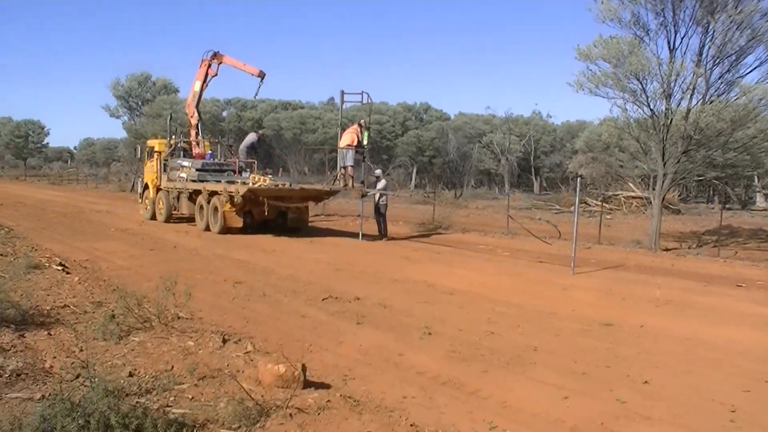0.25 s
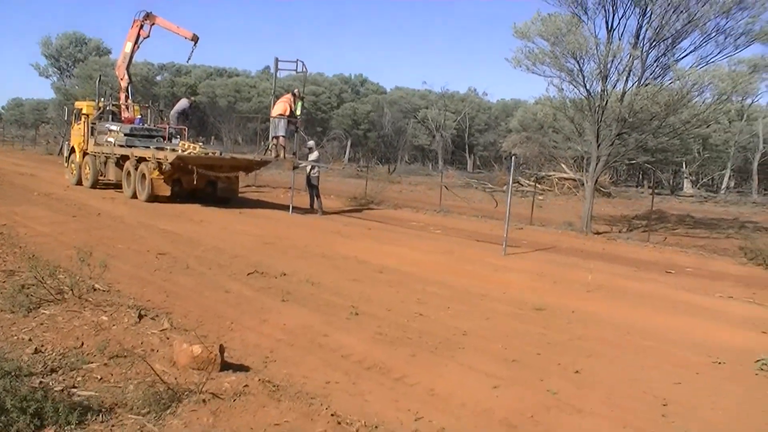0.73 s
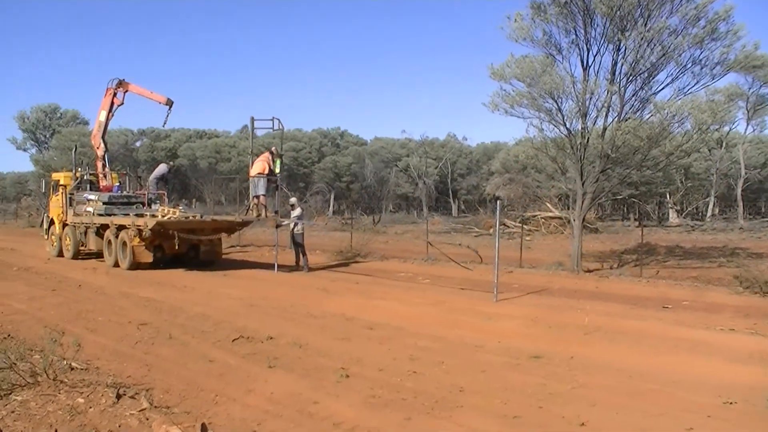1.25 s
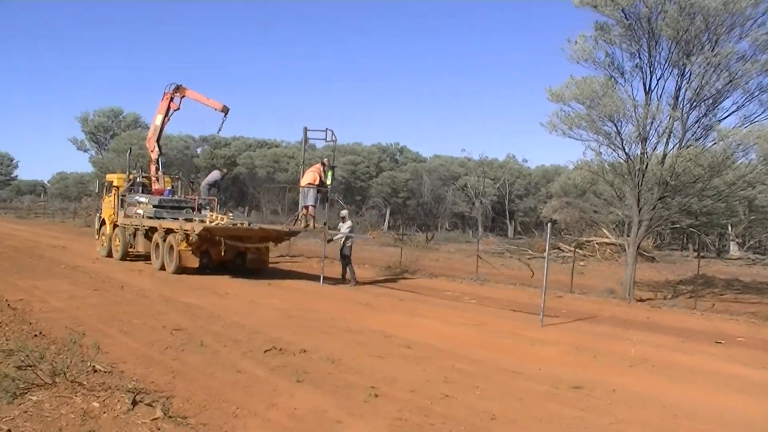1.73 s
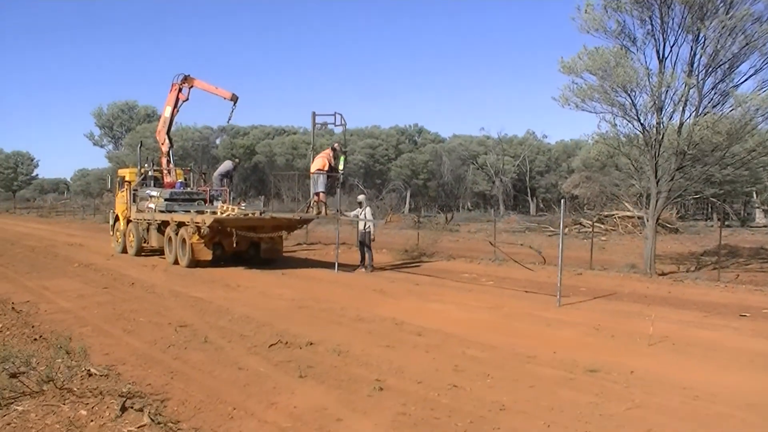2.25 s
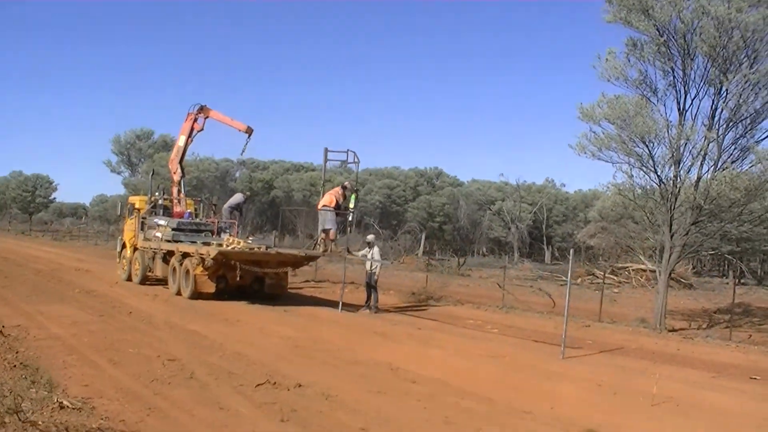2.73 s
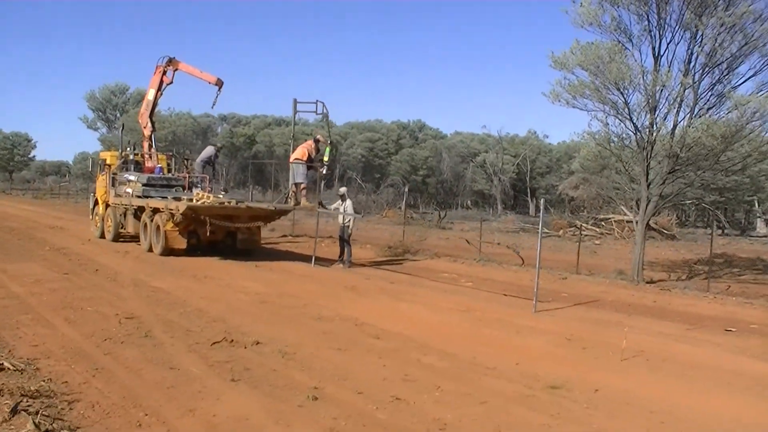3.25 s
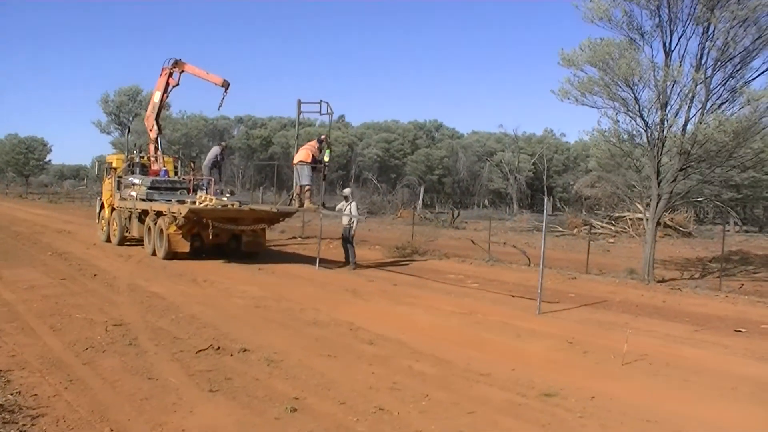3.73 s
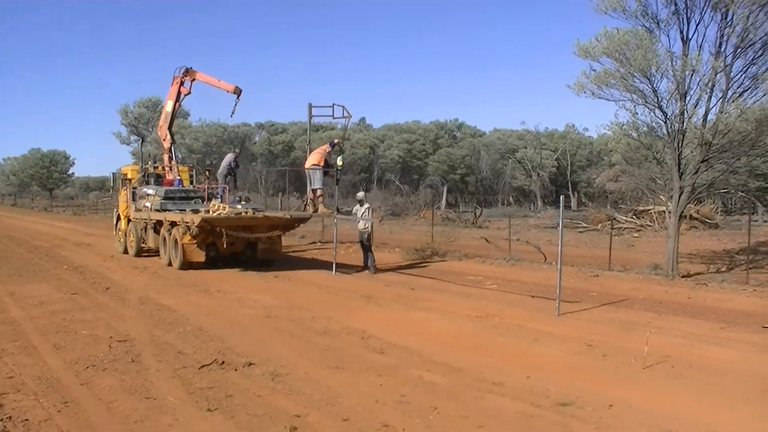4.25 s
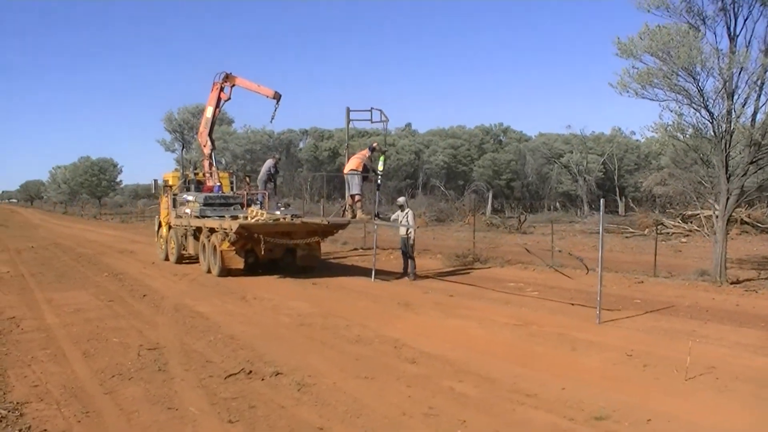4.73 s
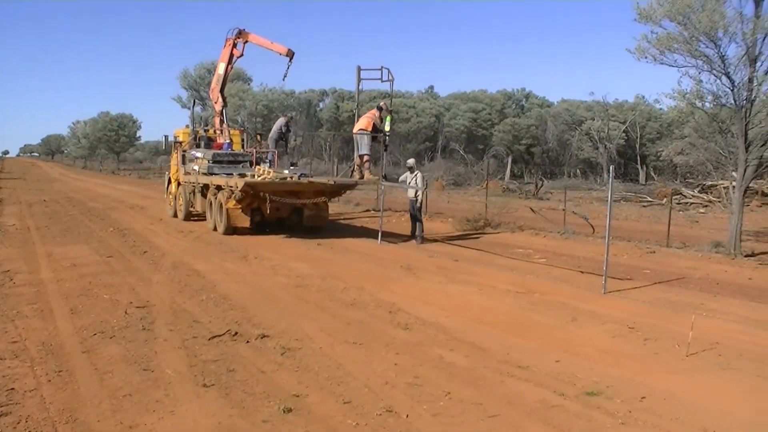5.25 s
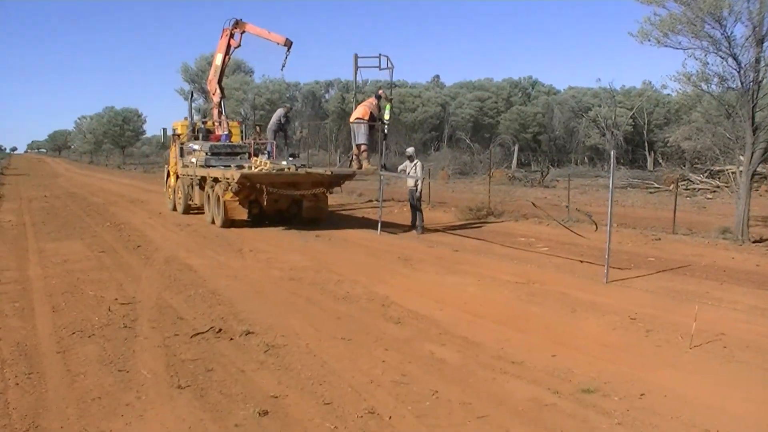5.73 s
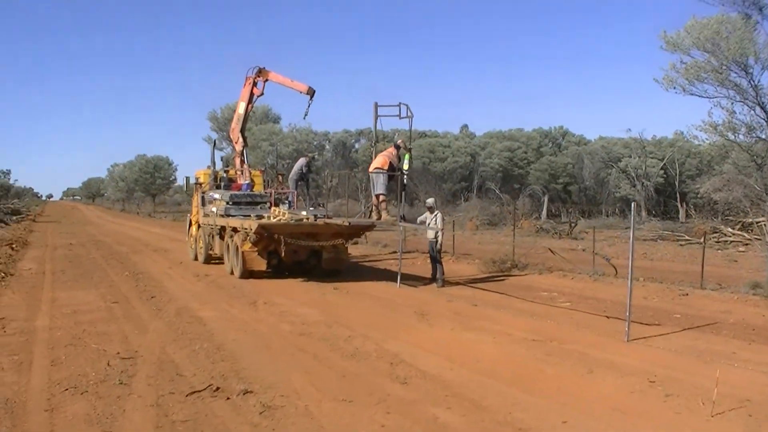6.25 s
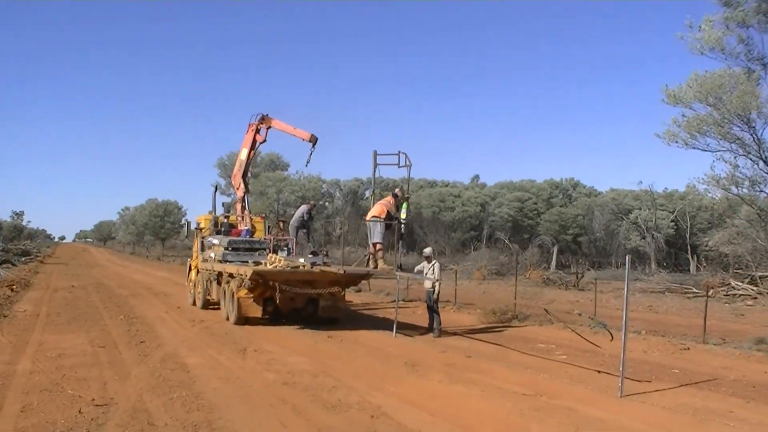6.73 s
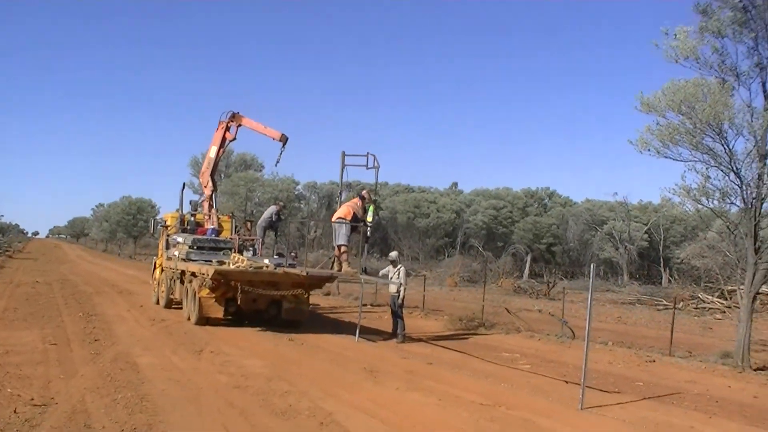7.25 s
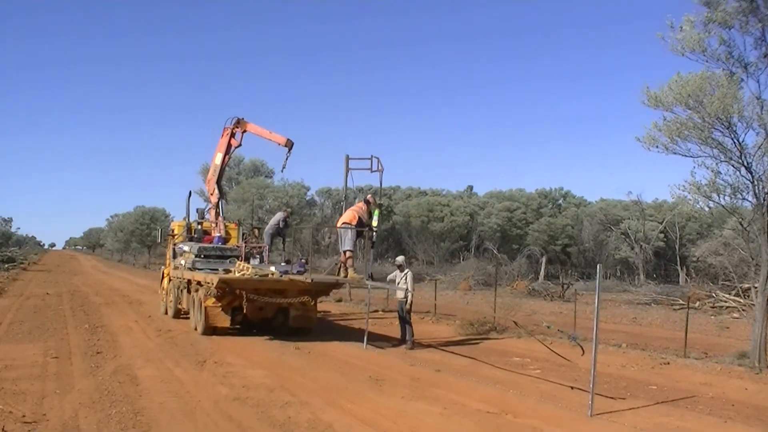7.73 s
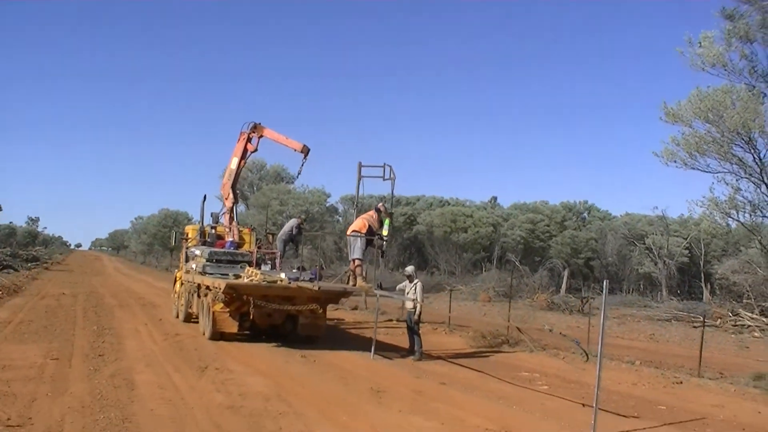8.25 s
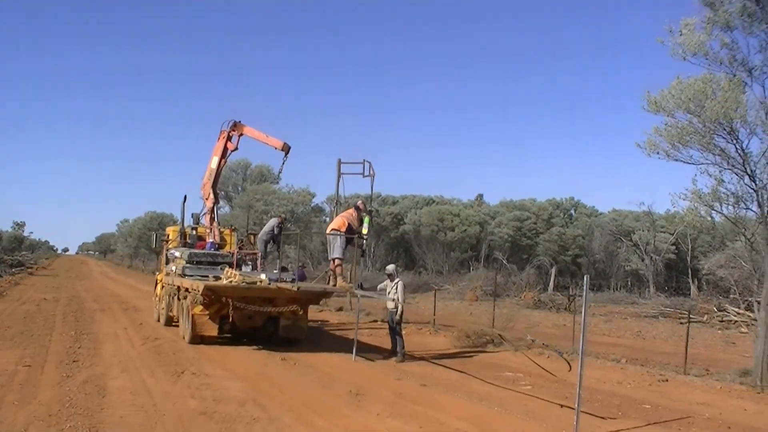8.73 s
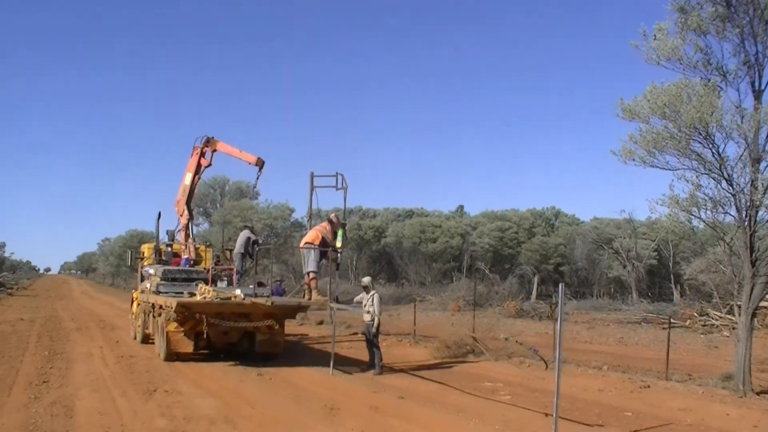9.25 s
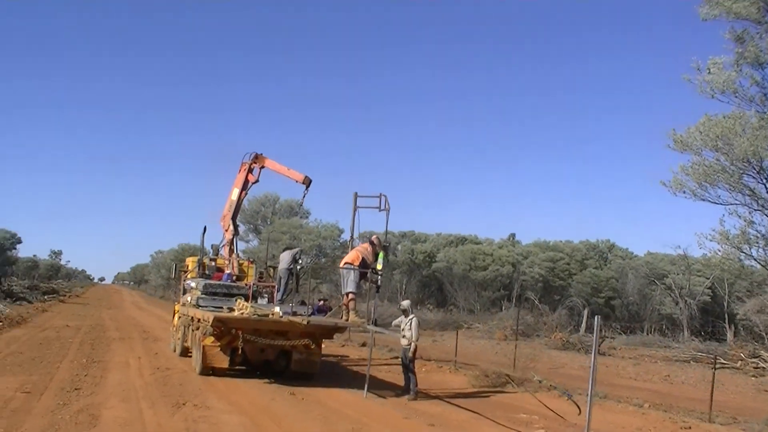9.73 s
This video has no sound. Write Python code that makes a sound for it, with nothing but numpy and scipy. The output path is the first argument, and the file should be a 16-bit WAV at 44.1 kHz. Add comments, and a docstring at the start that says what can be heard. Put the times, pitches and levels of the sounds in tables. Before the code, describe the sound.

A relentless metallic rattle from paired pneumatic hammers runs from start to end, ahead and slightly right. Each blow is a dry crack with harsh ringing and loose-part chatter; the two rhythms overlap and blur. A low, wavering diesel idle throbs behind it. A couple of dull knocks hit the truck around a third of the way in, then lumpy wind rumbles across the stereo microphone.

```python
"""Two jackhammers on one frame drive a steel fence post into dry ground, some way off in open bush.
One cracks hard and unevenly, the other beats slower and drifts through it: each blow is a noise burst.
The blows set loose parts rattling as longer noise and the steel ringing as resonances; a truck echoes them.
The truck takes a few dull knocks and idles, wavering tones over a throbbing rumble.
Wind puffs across the two microphone ports as lumpy low noise, with a brighter roar in strong gusts."""
import sys
import numpy as np
from scipy import signal
from scipy.fft import rfft, irfft, next_fast_len
from scipy.io import wavfile
from scipy.ndimage import uniform_filter1d

SR = 44100
rng = np.random.default_rng(int(sys.argv[2]) if len(sys.argv) > 2 else 0)


def master(y):
    """Save y as 16-bit WAV."""
    cut = np.clip(np.atleast_2d(y).T, -1, 1)
    pcm = np.round(cut * 32767)  # scale
    wavfile.write(sys.argv[1], SR, pcm.astype(np.int16))


def undo_db(level):
    """Turn decibels back into plain size, where 20 dB means ten times bigger."""
    steps = np.asarray(level, float) / 20
    return 10 ** steps


N = 440559
T = np.arange(N) / SR  # s
SAME_CRACK = 0.8  # how strongly cracks and echoes repeat from blow to blow, 0 to 1

# Spectrum of steel struck hard. Each row: frequency in Hz, relative level in dB.
CRACK_SPECTRUM = [(300, -64), (700, -11), (1100, -18.5), (2500, -3.5), (3600, -6.5), (6500, -3), (8000, 1),
                  (11000, -15), (16000, -14)]


def colour(x, points):
    """Filters by a smooth spectrum drawn through points of frequency in Hz and gain in dB."""
    size = next_fast_len(N)
    hz, db = np.transpose(points)
    curve = np.interp(np.log(np.fft.rfftfreq(size, 1 / SR) + 1), np.log(hz), db)
    return irfft(rfft(x, size) * undo_db(curve), size)[..., :N]


def resonate(x, hz, width):
    """A resonance of about unit gain at its pitch, which may follow a curve; pitch and width in Hz."""
    turn = np.exp(2j * np.pi * np.cumsum(hz * np.ones(N)) / SR)
    r = np.exp(-np.pi * width / SR)
    # shift the pitch down to zero, smooth there, shift back up
    smooth = signal.lfilter([1 - r], [1, -r], x / turn)
    return 2 * (turn * smooth).real


def clicks(s, db):
    """One click of power at each time."""
    at = np.clip((s * SR).astype(int), 0, N - 1)
    return np.bincount(at, undo_db(db) ** 2, N)


def burst(power, rise_ms, fall_ms, same):
    """Noise that flares at each click and dies; a share repeats, changing slowly as the post sinks."""
    renewals = 12  # the repeated shape blends into a new one this many times
    ms = np.arange(SR // 12) * 1000 / SR
    shape = np.minimum(ms / rise_ms, 1) * np.exp(-ms / (2 * fall_ms))
    habits = rng.standard_normal((renewals + 1, len(ms))) * shape
    repeated = np.zeros(N + len(ms))
    for at in np.flatnonzero(power):
        k, part = divmod(at / N * renewals, 1)
        angle = part * np.pi / 2
        blend = np.cos(angle) * habits[int(k)] + np.sin(angle) * habits[int(k) + 1]
        repeated[at:at + len(ms)] += np.sqrt(power[at]) * blend
    envelope = np.sqrt(abs(signal.oaconvolve(power, shape ** 2)[:N]))
    fresh = envelope * rng.standard_normal(N)
    same = np.clip(same, 0, 1)
    return same * repeated[:N] + np.sqrt(1 - same ** 2) * fresh


def wobble(ms):
    """A smooth random curve of unit size, from noise averaged twice over a span in ms."""
    width = int(ms * SR / 1000)
    x = uniform_filter1d(uniform_filter1d(rng.standard_normal(N), width), width)
    return x / x.std()


def swell(s, spread):
    """A smooth bump of height 1."""
    return np.exp(-((T - s) / spread) ** 2)


def hammers():
    """Each blow cracks and sets loose steel rattling and ringing; hard ones also echo off the truck."""
    # Blows of the louder hammer. Each row: time in seconds, relative level in dB.
    hard_blows = [(0.0092, -14.5), (0.059, -13.5), (0.1098, -13.5), (0.1553, -14), (0.1988, -15.5),
                  (0.2417, -15.5), (0.2846, -15), (0.327, -13.5), (0.3783, -13), (0.4274, -14),
                  (0.4742, -14), (0.5173, -14), (0.5594, -12.5), (0.6008, -12.5), (0.645, -12),
                  (0.6903, -13), (0.7414, -10.5), (0.7932, -14), (0.839, -13), (0.8841, -12.5),
                  (0.9266, -12.5), (0.9663, -13.5), (1.0069, -13), (1.0508, -14), (1.0972, -12.5),
                  (1.147, -12.5), (1.1949, -13), (1.2391, -12), (1.282, -12), (1.3252, -14.5),
                  (1.3643, -12.5), (1.4017, -11.5), (1.4396, -11.5), (1.4773, -12.5), (1.5128, -12.5),
                  (1.5492, -12.5), (1.589, -11.5), (1.629, -10), (1.6729, -8), (1.72, -10.5), (1.7718, -10),
                  (1.8291, -11.5), (1.891, -10), (1.9436, -9), (1.9904, -11.5), (2.0349, -13),
                  (2.079, -12.5), (2.1235, -12.5), (2.1721, -12.5), (2.2268, -13), (2.282, -10.5),
                  (2.33, -10), (2.3757, -11), (2.4184, -10.5), (2.46, -11), (2.501, -10), (2.5427, -10),
                  (2.5844, -10), (2.6316, -12), (2.6846, -12.5), (2.7325, -12.5), (2.7782, -12),
                  (2.823, -11), (2.8649, -13), (2.9058, -14), (2.9446, -12.5), (2.9868, -11.5),
                  (3.0324, -12), (3.08, -11.5), (3.1329, -11.5), (3.183, -10.5), (3.2304, -11.5),
                  (3.273, -13.5), (3.314, -13.5), (3.351, -13), (3.393, -15), (3.4338, -13), (3.478, -11.5),
                  (3.523, -8), (3.5676, -10), (3.61, -11), (3.6496, -12.5), (3.688, -11.5), (3.727, -14),
                  (3.7635, -14), (3.8017, -10.5), (3.844, -11.5), (3.8881, -13.5), (3.9334, -13),
                  (3.978, -13.5), (4.023, -13.5), (4.0648, -12.5), (4.1055, -14.5), (4.1439, -12),
                  (4.1803, -9.5), (4.218, -12.5), (4.254, -12), (4.292, -14), (4.327, -12.5),
                  (4.362, -10.5), (4.4006, -11.5), (4.439, -8.5), (4.482, -11), (4.5253, -11.5),
                  (4.5681, -11.5), (4.6085, -11.5), (4.6468, -10.5), (4.686, -12.0), (4.718, -8.5),
                  (4.76, -13.5), (4.803, -14.5), (4.8455, -14.5), (4.8924, -12.5), (4.9433, -11),
                  (4.9959, -12), (5.04, -11.5), (5.0825, -11.5), (5.125, -13), (5.1657, -11.5),
                  (5.2068, -13), (5.247, -10.5), (5.29, -10.5), (5.337, -10.5), (5.386, -11), (5.4315, -12),
                  (5.4769, -11.5), (5.5167, -11.5), (5.556, -12), (5.598, -12.5), (5.6356, -9.5),
                  (5.6746, -11.5), (5.7208, -12.5), (5.768, -12.5), (5.8118, -11), (5.852, -12),
                  (5.8958, -13), (5.9364, -13), (5.98, -13), (6.0279, -11), (6.0809, -10.5), (6.132, -9.5),
                  (6.176, -9), (6.2201, -11.5), (6.2633, -12), (6.3045, -9.5), (6.3454, -11),
                  (6.3859, -10.5), (6.4304, -11.5), (6.4788, -11), (6.526, -9.5), (6.5704, -10),
                  (6.6138, -12), (6.655, -12), (6.6943, -11.5), (6.7347, -11), (6.7713, -11), (6.8091, -11),
                  (6.8504, -12), (6.892, -13), (6.9339, -14.5), (6.976, -17), (7.016, -14.5), (7.0549, -10),
                  (7.0922, -11), (7.129, -12.5), (7.167, -11), (7.207, -10.5), (7.249, -11.5),
                  (7.2919, -10.5), (7.3306, -15.5), (7.3703, -13.5), (7.407, -15), (7.444, -13.5),
                  (7.4827, -14), (7.5238, -13.5), (7.5694, -11.5), (7.6126, -12.5), (7.6547, -13.5),
                  (7.6951, -13.5), (7.7346, -13.5), (7.775, -12.5), (7.8162, -13.5), (7.8594, -13.5),
                  (7.906, -14), (7.9507, -15), (7.9916, -15.5), (8.0325, -14), (8.0699, -13), (8.11, -15),
                  (8.15, -14.5), (8.1953, -12.5), (8.2406, -14), (8.284, -14.5), (8.3244, -11.5),
                  (8.3649, -12.5), (8.403, -12.5), (8.4437, -13.5), (8.481, -12), (8.5197, -12),
                  (8.563, -12), (8.609, -12.5), (8.6545, -13.5), (8.6983, -12.5), (8.7402, -14),
                  (8.7789, -12), (8.819, -13), (8.856, -12), (8.893, -12.5), (8.9342, -11.5),
                  (8.9732, -11.5), (9.0175, -13), (9.0626, -13), (9.1061, -13.5), (9.1464, -14),
                  (9.187, -11), (9.226, -12), (9.2649, -13), (9.3, -12.5), (9.3384, -16.5), (9.3779, -13),
                  (9.4195, -14.5), (9.4622, -11.5), (9.5095, -11.5), (9.5557, -13.5), (9.5985, -15.5),
                  (9.643, -18.5), (9.6814, -14.5), (9.7207, -14), (9.7586, -13.5), (9.7994, -13.5),
                  (9.8406, -10.5), (9.8851, -10.5), (9.9285, -10.5), (9.9686, -12)]
    # Spectrum of the loose steel. Each row: frequency in Hz, relative level in dB.
    rattle_spectrum = [(300, -33), (700, -8.5), (1100, -34), (1600, -4.5), (2800, -7.5), (3600, -19.5),
                       (7400, -1), (10000, -15), (16000, -53)]
    s, blow_db = np.transpose(hard_blows)
    slow_s, slow_db = slow_blows(s)
    # small random shifts keep the rounded times from lining up into a steady tone
    s = s + rng.uniform(-1, 1, len(s)) / 20000
    slow_s = slow_s + rng.uniform(-1, 1, len(slow_s)) / 2000
    hard, slow = clicks(s, blow_db), clicks(slow_s, slow_db)

    echoes = truck_echoes(s, blow_db)
    crack = burst(hard, 1.35, 2.72, SAME_CRACK) + undo_db(-3.5) * burst(slow, 0.34, 2.14, SAME_CRACK)
    hard_rattle = undo_db(-9.0) * burst(hard, 2.25, 11.8, 0.6)
    slow_rattle = undo_db(-4.5) * burst(slow, 1.8, 8.6, 0.6)
    chatter = undo_db(0.97 * wobble(1.1))  # loose parts chatter unevenly
    rattle = chatter * (hard_rattle + slow_rattle)
    # the piston lands just after the first crack
    push = undo_db(22) * np.roll(np.sqrt(hard), int(1.2 * SR / 1000))
    push = uniform_filter1d(push, size=5)  # steel on steel gives a little: the push is not a point
    struck = colour(crack + echoes, CRACK_SPECTRUM) + colour(rattle, rattle_spectrum)
    return undo_db(2.0) * struck + ringing_steel(push, echoes, crack, rattle)


def slow_blows(hard_s):
    """Times and strengths of the slower hammer, which keeps a near steady beat."""
    # Drift about that beat. Each row: time in seconds, how early in ms, relative level in dB.
    drift = [(0, 2.5, -25.5), (0.451, 7.5, -20.5), (0.851, 17.5, -18), (1.148, 15.5, -21),
             (1.65, 11.5, -17.5), (1.901, 22, -18.5), (2.35, 17, -30), (2.599, 28, -31), (2.918, 17, -21),
             (3.5, 24.5, -12.5), (4.002, 25, -17.5), (4.251, 19.5, -14.5), (4.601, 15.5, -15),
             (4.851, 24.5, -14), (5.299, 33, -23.5), (5.598, 18, -18.5), (5.9, 10, -15.5),
             (6.201, 11.5, -24), (6.449, 22.5, -27), (6.699, 8, -16.5), (7.1, 6, -16), (7.381, 11, -22),
             (7.699, 5.5, -17.5), (8.12, 1, -19.5), (8.349, 7, -14.5), (8.801, 0, -18), (9.3, 0.5, -22),
             (9.65, 7.5, -14), (9.799, -9.5, -19), (9.99, -1, -28)]
    period_s, uneven_db = 0.0451, 2.5
    yield_db, yield_ms = -10.5, 4.1
    at, early_ms, db = np.transpose(drift)
    beat = np.arange(0, N / SR, period_s)
    s = beat - np.interp(beat, at, early_ms) / 1000
    next_hard = np.minimum(np.searchsorted(hard_s, s), len(hard_s) - 1)
    ahead_ms = 1000 * (hard_s[next_hard] - s)
    # a slow blow that falls just ahead of a hard one lands weakly
    weak_db = yield_db * np.exp(-(ahead_ms / yield_ms) ** 2)
    chance_db = uneven_db * rng.standard_normal(len(beat))
    return s, np.interp(beat, at, db) + chance_db + weak_db


def truck_echoes(s, blow_db):
    """Each hard blow comes back off the truck as delayed bursts of uneven strength."""
    # Each row: delay after the blow in ms, level against the blow in dB.
    returns = [(7, -19), (15, -8), (20, -11.5)]
    chance_db = 2.0 * rng.standard_normal((len(s), len(returns)))
    echoes = np.zeros(N)
    for k, (ms, db) in enumerate(returns):
        delayed = clicks(s + ms / 1000, db + blow_db + chance_db[:, k])
        echoes += burst(delayed, 0.31, 3.0, SAME_CRACK)
    return echoes


def ringing_steel(push, echoes, crack, rattle):
    """Modes of bit, cap and post ring as narrow resonances, driven by the blows and what follows them."""
    # Pitches of the modes in Hz.
    mode_hz = [730, 1200, 1465, 1760, 2100, 2450, 2760, 3150, 4150, 4625, 5200, 5838, 7120, 7345, 7500,
               7800, 9300, 10880, 12220, 13500]
    # Each row, in the order of the pitches: width in Hz, level in dB over the nearest region.
    mode_shape = [(327, 28.5), (113, 25.5), (84, 37.5), (403, 34), (162, 9), (162, 25), (296, 33), (79, 19),
                  (185.19, 23.5), (101, 41), (255, 30.5), (51.7, 47), (78.6, 37), (57, 43), (108, 29.5),
                  (231.48, 11.5), (282, 20), (205.2, 33), (89, 35.5), (120, 17)]
    # Centres of the pitch regions of the post in Hz.
    region_hz = [1800, 1200, 1460, 2750, 4620, 5840, 7300, 12200]
    # Each region shifts as the post sinks, and swells or dulls once. Each row: relative level in dB
    # at first, the same at last, swell in dB, its time in seconds, its spread in seconds.
    region_levels = [(-44, -38, 20, 0.76, 1.74), (-30.5, -30.5, -55, 0.55, 0.89),
                     (-38.5, -47, 13, 7.86, 5.7), (-39, -30.5, -33, 5.35, 0.51),
                     (-37.5, -33, -5, 7.37, 1.1), (-39, -36.5, 9.5, 3.02, 0.37),
                     (-28.5, -31.5, 4.5, 6.6, 1.14), (-61, -41, 13, 6.77, 0.54)]
    # Tone of the ringing, with little bass. Each row: frequency in Hz, gain in dB.
    ring_tone = [(250, -28.5), (1300, 2.5), (9000, -3), (16000, -5)]
    regions_db = [first + (last - first) * T / T[-1] + db * swell(at, spread)
                  for first, last, db, at, spread in region_levels]
    strain = 1 + 0.0029 * wobble(70)  # load on the steel bends every pitch a little
    rings = np.zeros(N)
    for hz, (width, db) in zip(mode_hz, mode_shape):
        nearest = np.argmin(abs(np.log(hz / np.array(region_hz))))
        # push and echoes carry mostly the low modes, crack and rattle the high ones
        low = 1 / (1 + (hz / 3000) ** 2)
        drive = low * (push + undo_db(-6.5) * echoes) + (1 - low) * (undo_db(4.5) * crack + rattle)
        level_db = db + regions_db[nearest] + 1.17 * wobble(27)
        rings += resonate(undo_db(level_db) * drive, hz * strain, width)
    return colour(rings, ring_tone)


def knocks():
    """Dull knocks on the truck: a push with almost no ring, and a short bright tick."""
    # Each row: time in seconds, relative level in dB, pitch in Hz.
    truck_knocks = [(1.681, -19, 494), (3.3668, -12.5, 900), (3.393, -13.5, 1020)]
    s, db, _ = np.transpose(truck_knocks)
    out = colour(burst(clicks(s, db + 4), 0.3, 0.67, 0), CRACK_SPECTRUM)  # the ticks
    for at, level_db, hz in truck_knocks:
        push = clicks(np.array([at]), [0])
        for _ in range(2):  # twice through a resonance wider than its pitch
            push = resonate(push, hz, 1.2 * hz)
        out += undo_db(level_db + 24.0) * push
    return out


def engine():
    """Firing orders as wavering tones over a rumble that throbs with each firing."""
    # Each row: multiple of the firing rate, tone level in dB (rms, at the start).
    orders = [(2, -75), (3, -71), (4, -72), (5, -66.5), (6, -64.5), (7, -62.5), (8, -63.5), (9, -65),
              (10, -60.5), (11, -61.5), (13, -67.5), (15, -84)]
    # Spectrum of the rumble. Each row: frequency in Hz, relative level in dB.
    rumble_spectrum = [(30, -34), (100, -24), (250, -5), (400, -2), (800, 1), (3000, 7), (16000, -24)]
    firing_hz, fade_db_per_s, rumble_db = 25.69, -0.04, -40
    turns = np.cumsum(firing_hz * (1 + 0.00339 * wobble(280))) / SR  # counts firings
    tones = np.zeros(N)
    for k, db in orders:
        level = np.sqrt(2) * undo_db(db + 3.3 * wobble(37))
        tones += level * np.sin(2 * np.pi * (k * turns + rng.random()))
    throb = 1 + 0.062 * np.cos(2 * np.pi * turns)
    rumble = colour(throb * rng.standard_normal(N), rumble_spectrum)
    return undo_db(fade_db_per_s * T) * (tones + undo_db(rumble_db) * rumble / rumble.std())


def wind():
    """Lumpy low turbulence, mostly opposite in the two ports; strong gusts add a brighter roar."""
    # Puffs of wind. Each row: time in seconds, relative peak level in dB, spread in seconds.
    gusts = [(.46, -58, .08), (3.3, -52, .06), (3.46, -36.5, 0.061), (3.8, -44, 0.23), (4.06, -39, .04),
             (4.16, -37, 0.064), (4.38, -39, 0.065), (4.52, -42, .06), (4.72, -35.5, 0.087),
             (4.92, -29, 0.038), (5.02, -32, 0.034), (5.12, -40, .1), (5.22, -33, 0.085), (5.68, -50, 0.17),
             (6.04, -50, 0.051), (6.78, -41.5, 0.11), (7.17, -39.5, 0.12), (7.46, -42, .04),
             (9.46, -57, .12), (9.98, -56, .1)]
    # Spectrum of the low turbulence. Each row: frequency in Hz, relative level in dB.
    low_spectrum = [(20, -24), (40, -4), (70, 3), (110, 0.5), (150, -3), (300, -13), (600, -32),
                    (1200, -36)]
    # Spectrum of the roar. Each row: frequency in Hz, relative level in dB.
    roar_spectrum = [(60, -14), (250, -1.5), (420, -6.5), (700, -20), (1200, -24), (3000, -45)]
    calm_db = -62.5  # on the same scale as the puffs
    strength = undo_db(calm_db) + sum(undo_db(db) * swell(s, spread) for s, db, spread in gusts)
    gust_db = 20 * np.log10(strength)
    noise = undo_db(5.0 * wobble(14.0)) * rng.standard_normal((2, 2, N))
    low = undo_db(gust_db + 14.0) * colour(noise[0], low_spectrum)
    roar = undo_db(1.5 * gust_db + 32.5) * colour(noise[1], roar_spectrum)  # grows faster than the gust
    apart, alike = low + roar
    return np.array([apart + 0.22 * alike, -apart + 0.5 * alike])


def scene():
    """Sources ahead, a little to the right; warm moving air scatters a share unlike in each port."""
    # The microphone turns a little. Each row: time in seconds, left minus right in dB.
    turning = [(0, 0), (4, -0.24), (7.3, -0.5), (8.1, -1.1), (9.99, -1)]
    # The left-right balance changes with pitch. Each row: frequency in Hz, left minus right in dB.
    port_difference = [(60, -1.5), (87, -2.0), (130, -3), (180, -3.0), (260, -3.0), (380, -1), (550, -3.5),
                       (790, -2.5), (1140, -3.0), (1650, -2.5), (2380, -2), (3440, -5), (4970, -1),
                       (7180, -0.5), (10400, -6.5), (15000, 1.5)]
    # The scattered share. Each row: frequency in Hz, gain in dB.
    scatter = [(300, -8), (1500, -20), (4000, -19), (8000, -12), (15000, -7)]
    ahead = hammers() + knocks() + engine()
    pan_db = np.interp(T, *np.transpose(turning))
    scattered = colour(ahead, scatter) * np.array([wobble(2.7), wobble(3.4)])
    # half of the difference goes to each port
    ports = np.array([colour(ahead, np.multiply(port_difference, [1, half])) for half in (0.5, -0.5)])
    return (ports + scattered) * undo_db([pan_db / 2, -pan_db / 2]) + wind()


def roll_off(x):
    """The treble ends steeply here."""
    return signal.sosfilt(signal.butter(12, 16460, fs=SR, output="sos"), x)


def record(dry):
    """Microphone colour, then a soft knee on the peaks."""
    # Each row: frequency in Hz, gain in dB.
    microphone = [(20, -20), (60, -9), (150, 0), (12500, 1), (15000, -12), (15900, -13.5), (16400, -50)]
    heard = colour(dry, microphone)
    mix = 1.157 * np.tanh(heard / 1.045)
    return roll_off(mix)


dry = scene()
out = record(dry)
master(out)
```